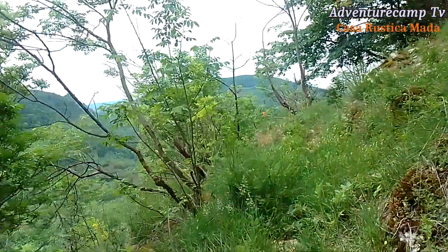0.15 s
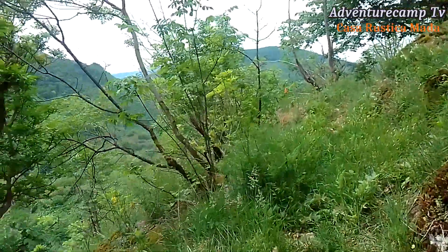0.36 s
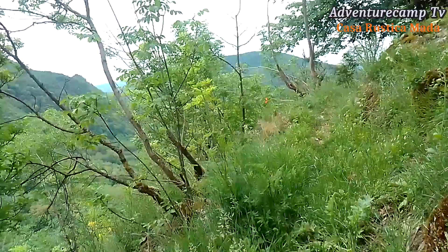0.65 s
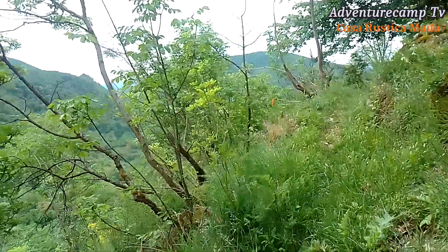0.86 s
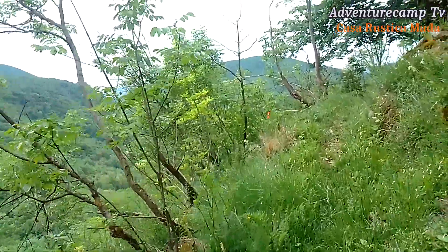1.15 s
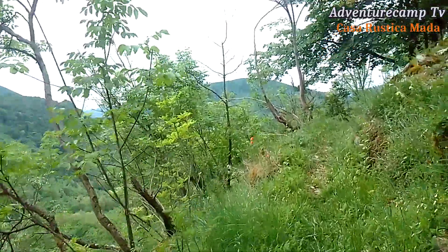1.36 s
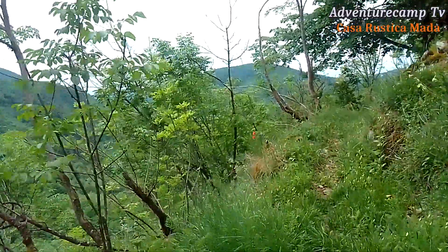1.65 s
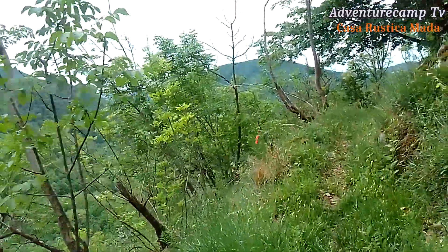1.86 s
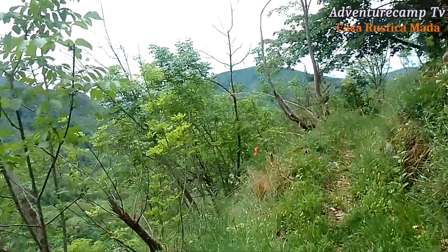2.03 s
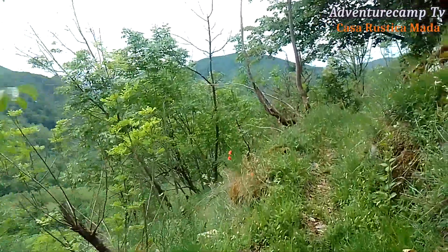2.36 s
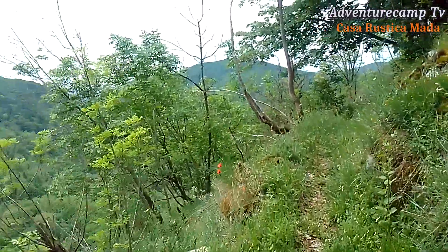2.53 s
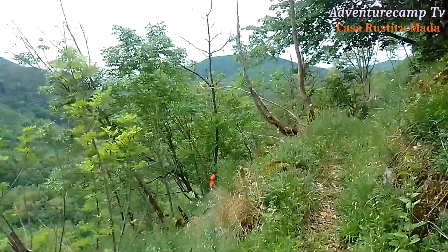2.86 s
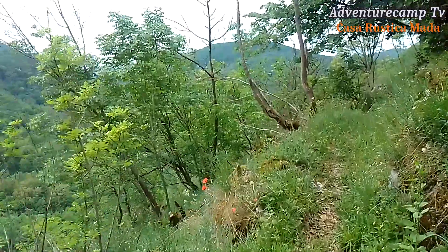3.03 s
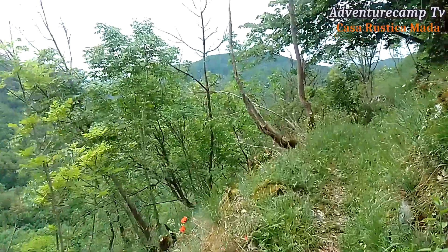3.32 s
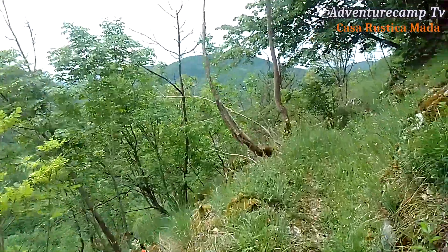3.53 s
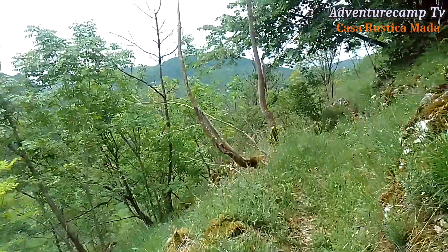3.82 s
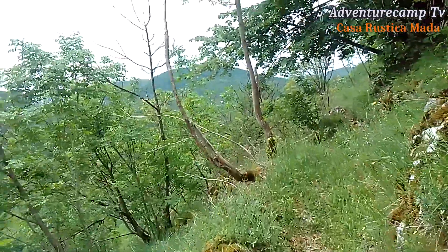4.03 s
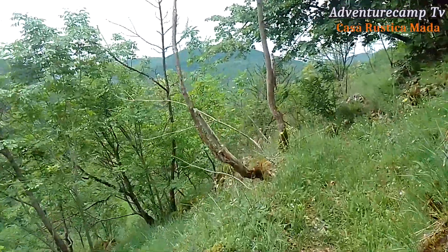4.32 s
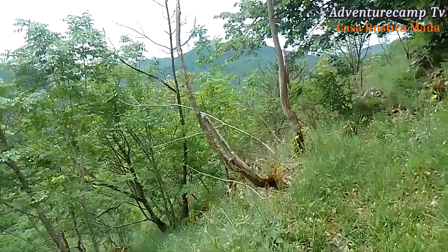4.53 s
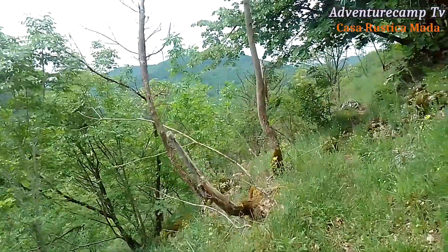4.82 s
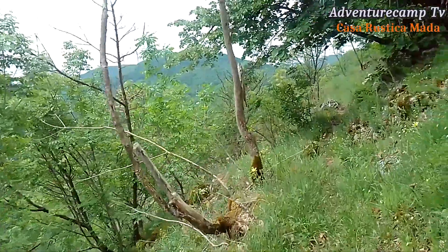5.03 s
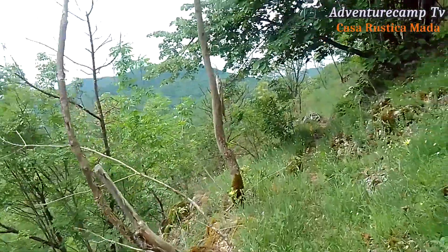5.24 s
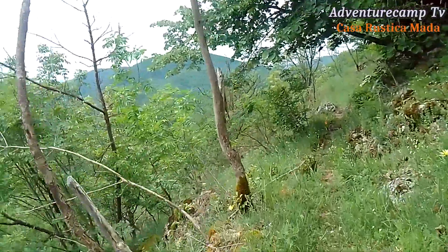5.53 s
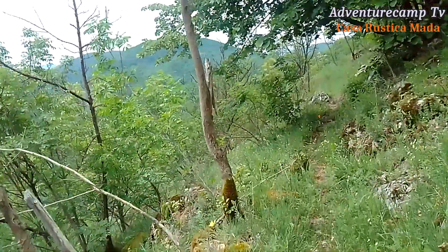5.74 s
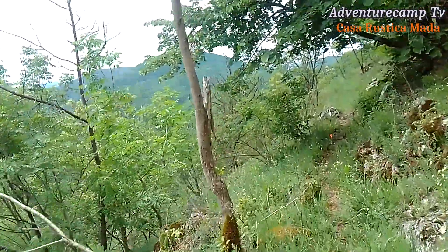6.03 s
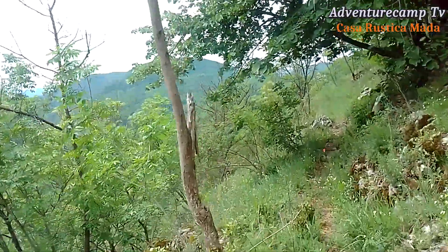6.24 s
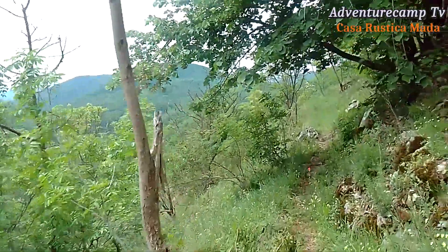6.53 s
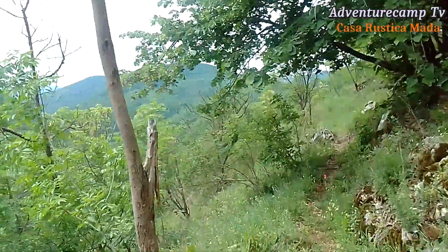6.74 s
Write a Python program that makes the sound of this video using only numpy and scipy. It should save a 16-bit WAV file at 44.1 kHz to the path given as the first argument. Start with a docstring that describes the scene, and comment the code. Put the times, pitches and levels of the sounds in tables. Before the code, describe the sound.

A hiker walks through tall grass on a hillside, close to the microphone. Uneven, high, hissy swishes mix with sharp stem snaps and soft, dull boot thuds. The loudest cracks and a burst of crackling come in the first half, then the rustling grows lighter. A distant river rushes quietly throughout. Faint chirps appear midway, and a bird whistles alternating high and low notes near the end.

```python
"""Hiking through tall grass

A hiker on a hillside path carries a small camera whose microphone port (its opening) rings near 7 kHz.
Grass swishes as many tiny blades slip, stems snap in sharp bursts and boots thud on soft ground.
Behind them wind buffets the port, a river rushes far down the valley and birds whistle high and low.
The camera turns itself down for a moment after the loudest cracks."""
import sys
import numpy as np
from scipy import signal
from scipy.io import wavfile
from scipy.ndimage import uniform_filter1d

SR = 44100
rng = np.random.default_rng(int(sys.argv[2]) if len(sys.argv) > 2 else 0)


def log_audio(samples):
    """Write samples as a 16-bit WAV file to the path given in sys.argv[1]."""
    # one column per channel
    frames = np.atleast_2d(samples).T
    # limit to full scale, then quantise
    limited = np.clip(frames, -1, 1)
    pcm = np.round(limited * 32767).astype(np.int16)
    wavfile.write(sys.argv[1], SR, pcm)


N = 303408
TIME = np.arange(N) / SR

# Tone colours (how strong each frequency is) that several sounds share: f/Hz, level/dB
DULL_SCUFF = [(600, -7.5), (1100, 4.5), (1600, -0.5), (2400, -1), (3800, -1.5), (4600, -5), (6000, -23)]
AIRY_TOP = [(9000, -31.5), (10500, 0), (12500, -2.5), (14500, -5.5), (15700, -4), (17000, -7)]
LOW_RUSTLE = [(150, -32), (230, -2.5), (500, 0.5), (900, -3), (1600, -49)]


def gain_of(db):
    """Turns decibels into a number to multiply a sound by."""
    return 10 ** (np.asarray(db) / 20)


def evened(x):
    """Scales a signal so that its average power is 1."""
    return x / np.sqrt(np.mean(x ** 2) + 1e-20)


def follow(rows, t):
    """Reads a table at the times t, drawing straight lines between its rows."""
    times, *columns = np.transpose(rows)
    return [np.interp(t, times, column) for column in columns]


def add(mix, start, sound):
    """Lays a sound into the mix, start seconds in."""
    part = mix[round(start * SR):][:len(sound)]
    part += sound[:len(part)]


def colour(x, points, size=4096):
    """Gives x a tone colour, using a filter of energy 1 that rings only after it is struck."""
    f, db = np.transpose(points)
    hz = np.abs(np.fft.fftfreq(size, 1 / SR))
    log_gain = np.log(gain_of(np.interp(np.log(hz + 1), np.log(f + 1), np.maximum(db, -90))))
    response = np.exp(np.conj(signal.hilbert(log_gain)))
    taps = np.fft.ifft(response).real[:size // 2]
    return signal.oaconvolve(x, taps / np.linalg.norm(taps))[:len(x)]


def flicker(ms, db):
    """A random gain that wanders by about db decibels over about ms milliseconds."""
    span = max(round(ms * SR / 1000), 1)
    drift = uniform_filter1d(uniform_filter1d(rng.standard_normal(N), span), span)
    return gain_of(db * evened(drift))


def patches(bins, frames, high, long):
    """A random map of blobs, each about `high` frequency steps by `long` time steps."""
    noise = rng.standard_normal((frames, bins))
    return evened(uniform_filter1d(uniform_filter1d(noise, high, axis=1), long, axis=0)).T


def hiss():
    """The steady hiss of leaves and of the microphone itself."""
    tone = [(710, -26.5), (1200, -13), (1490, -3.5), (3130, -16), (5370, -10), (6390, -21), (7510, -10),
            (8360, -31.5), (9420, -15), (15100, -23), (15800, -5.5)]  # colour of the hiss: f/Hz, level/dB
    return gain_of(-56.5) * colour(rng.standard_normal(N), tone)


def wind():
    """Wind buffets the port and makes a low, lumpy rumble."""
    gusts = [(0.0, -71.5), (0.21, -75.5), (1.42, -71.5), (1.92, -84.5), (1.97, -66), (2.01, -80),
             (2.47, -82), (2.72, -71), (2.95, -84), (3.41, -78.5), (3.43, -70), (3.85, -99), (3.91, -77.5),
             (5.42, -82), (5.48, -74), (5.73, -80), (6.75, -74.5), (6.88, -81)]  # strength of the buffeting: t/s, level/dB
    tone = [(20, -1), (45, -9), (90, -1), (130, 2.5), (165, -5), (200, -4), (300, -43)]  # colour of the rumble: f/Hz, level/dB
    lumps = rng.standard_normal(N) * flicker(ms=64, db=2.5)
    return gain_of(follow(gusts, TIME)[0]) * colour(lumps, tone, size=16384)


def river():
    """A far roar. The slope blocks its treble, and the slope's echo cuts a notch (a narrow dip) in it."""
    loudness = [(0.0, -42.5), (0.73, -46), (0.82, -47.5), (1.05, -47), (1.4, -42.5), (1.55, -45),
                (1.78, -45), (2.05, -44.5), (3.35, -42), (3.68, -44), (4.92, -41.5), (5.31, -43),
                (5.67, -42), (5.77, -43), (6.53, -41), (6.76, -40.5), (6.88, -41)]  # strength of the roar: t/s, level/dB
    tone = [(150, -53), (200, -13), (250, -5), (300, -2), (400, -2), (500, 0), (700, -1.5), (1000, -5.5),
            (1400, -11)]  # colour of the roar: f/Hz, level/dB
    # how the slope shades it as the hiker turns: t/s, upper edge/Hz, notch/Hz, notch depth/dB
    shade = [(0, 1100, 924, 22.5), (.6, 1140, 944, 26), (1, 990, 874, 31), (1.15, 700, 840, -1),
             (1.45, 720, 905, -6), (1.75, 945, 970, 16), (2, 1100, 940, 4), (2.3, 920, 930, 7.5),
             (2.9, 990, 910, 5), (3.15, 1100, 860, 5), (4.05, 1150, 980, 9.5), (4.4, 1015, 1060, 9.5),
             (5.3, 1270, 1000, 3.5), (5.65, 1220, 1020, 0), (5.9, 1146, 1030, 7), (6.88, 1190, 1020, 1)]
    hz = np.fft.rfftfreq(2048, 1 / SR)[:, None]
    t = np.arange(N // 512 + 6) * 512 / SR
    edge_hz, notch_hz, depth_db = follow(shade, t)
    hollow_db = 2.3 * np.exp(-((hz / edge_hz - .93) / .085) ** 2)  # a lift just under the edge
    blocked_db = 10 * np.log10(1 + (hz / edge_hz) ** 16.4)
    notch_db = depth_db * np.exp(-((hz - notch_hz) / 60) ** 2)
    f, db = np.transpose(tone)
    level_db = np.interp(np.log(hz + 1), np.log(f), db) + hollow_db - blocked_db - notch_db
    level_db += 2 * patches(len(hz), len(t), high=3, long=6)
    real, imag = rng.standard_normal((len(t), len(hz), 2)).T
    roar = signal.istft(gain_of(level_db) * (real + 1j * imag), nperseg=2048, noverlap=1536)[1][:N]
    gain = gain_of(follow(loudness, TIME)[0]) * flicker(ms=17, db=.8) * flicker(ms=53, db=.74)
    return gain * evened(roar)


def rush():
    """A narrow band of rushing noise, higher than the river, that comes and goes."""
    loudness = [(0, -63), (.4, -79), (3, -69), (6.3, -67.5), (6.6, -56), (6.88, -62)]  # t/s, level/dB
    centre_hz, width_hz = 1600, 240
    b, a = signal.iirpeak(centre_hz, centre_hz / width_hz, SR)
    band = signal.lfilter(b, a, rng.standard_normal(N))
    return gain_of(follow(loudness, TIME)[0]) * evened(band)


def whistle(notes, waver_hz):
    """Almost pure notes that glide, swell and fade; pitch and level waver on the way through leaves."""
    attack_s, swell_s, fade_db_per_s = .016, .024, 250
    waver = waver_hz * np.log(flicker(ms=2.4, db=20 / np.log(10)))
    out = np.zeros(N)
    for start, length, first_hz, last_hz, db, swell_at, top_db in notes:
        t = np.arange(0, length + .25, 1 / SR)
        glide_hz = last_hz + (first_hz - last_hz) * np.exp(-3 * t / length)
        hz = glide_hz + waver[round(start * SR):][:len(t)]
        swell_db = (top_db - db) * np.exp(-((t - swell_at) / swell_s) ** 4)
        fade_db = fade_db_per_s * np.maximum(t - length, 0)
        tone = np.sqrt(2) * np.sin(2 * np.pi * np.cumsum(hz) / SR)
        add(out, start, np.minimum(t / attack_s, 1) * gain_of(db + swell_db - fade_db) * tone)
    return out * flicker(ms=10, db=1.6)


def birds():
    """One bird's two-note calls echo off the trees; a farther bird is heard through echoes alone."""
    # notes, high then low: t/s, length/s, first f/Hz, last f/Hz, level/dB, loudest after/s, loudest/dB
    notes = [(4.875, 0.079, 4770, 4645, -69, .02, -60), (5.06, 0.13, 4010, 4125, -60, 0.059, -53),
             (5.345, .11, 5070, 4990, -59.5, .077, -43), (5.548, 0.083, 3950, 4050, -63.5, 0.014, -56),
             (5.855, 0.16, 5070, 5070, -53, 0.12, -51), (6.032, 0.11, 4030, 4100, -65, 0.13, -55),
             (6.36, 0.11, 5140, 5118, -54.5, .07, -41.5)]
    far_chirps = [(2.93, .08, 4300, 4210, -71, .04, -71), (3.04, 0.14, 4210, 4180, -66.5, .02, -65),
                  (3.19, .04, 4130, 4170, -69, .02, -66), (3.285, .025, 4240, 4240, -64, .01, -59),
                  (3.32, .03, 4030, 4020, -67, .01, -66), (3.415, 0.033, 3870, 3930, -65, .015, -53),
                  (3.465, .04, 4000, 4180, -62, .03, -54), (3.525, 0.061, 4200, 4100, -62.5, .015, -56),
                  (3.59, .025, 4070, 4000, -65, .01, -62)]  # the farther bird's notes: same columns
    calls = whistle(notes, waver_hz=14)
    twitter = gain_of(-6.5) * whistle(far_chirps, waver_hz=90.5)  # weakened by distance
    t = np.arange(SR // 2) / SR
    echoes = rng.standard_normal(len(t)) * gain_of(-60 * t / .4) * (1 - np.exp(-t / .015))
    scatter = rng.standard_normal(len(t)) * gain_of(-60 * t / .13)
    trail = gain_of(-9) * signal.oaconvolve(calls, echoes / np.linalg.norm(echoes))[:N]
    return calls + trail + signal.oaconvolve(twitter, scatter / np.linalg.norm(scatter))[:N]


def boots():
    """A boot on soft ground makes a low ring that dies quickly, and a longer muffled crunch."""
    steps = [(0.165, -40, 514, .05, -40.5), (0.24, -29.5, 271, 0.079, -41.5), (0.412, -34, 364, 0.058, -57),
             (0.798, -22.5, 336, 0.035, -35.5), (1.49, -26.5, 325, 0.041, -43),
             (1.58, -34, 400, 0.056, -43), (2.631, -39, 300, 0.082, -35.5), (3.457, -30, 608, 0.04, -47),
             (4.431, -23.5, 288, 0.034, -39), (5.03, -39.5, 450, .05, -41.5),
             (5.102, -21.5, 600, 0.03, -45), (5.49, -40, 594, .05, -40), (6.056, -26.5, 324, 0.054, -44.5),
             (6.168, -27, 576, 0.033, -51), (6.73, -38, 587, 0.12, -47)]  # boots landing: t/s, ring level/dB, f/Hz, time to fade 60 dB/s, crunch/dB
    out, t = np.zeros(N), np.arange(SR // 5) / SR
    for start, db, hz, fade_s, crunch_db in steps:
        ring = gain_of(db - 60 * t / fade_s) * np.sin(2 * np.pi * hz * t)
        crunch = gain_of(crunch_db - 60 * t / .4) * colour(rng.standard_normal(len(t)), LOW_RUSTLE)
        add(out, start, (ring + crunch) * (1 - np.exp(-t / .0014)))
    return out


def snaps():
    """A stem cracks in a burst that rings the port, then splinters; shorter bursts sound sharper."""
    # stems breaking: t/s, tick peak/dB, length/ms, then relative to the tick: crack/dB, scuff/dB, air/dB
    breaks = [(0.0638, -18, .3, -30, -35, -30), (0.0727, -18, 0.35, -33, -36, -34),
              (0.2107, -18, .5, -31, -35.5, -34), (0.274, -16.5, .4, -34, -38, -36),
              (0.6406, -32, 1.1, -30.5, -29, -25), (0.993, -32, .3, -24, -34, -20),
              (1.032, -24.5, 1.9, -31, -32, -38), (1.222, -30, 1.4, -28, -27, -28),
              (1.241, -27, 0.92, -30, -32, -30), (1.3325, -30, .4, -26, -23, -26),
              (1.5529, -21, .3, -36, -40, -32), (1.5765, -11, 0.32, -31, -42, -31),
              (1.5946, -4.5, 0.24, -39, -52, -40), (1.6446, 1.5, 0.37, -44, -59, -39),
              (2.068, -28, 1.5, -27, -30, -20), (2.2687, -23.5, .9, -39, -38, -38),
              (2.647, -22, 0.47, -29, -32, -26), (2.663, -16, 0.26, -31, -35, -27),
              (2.712, -17, 0.45, -28, -35, -32), (2.7433, -12, 0.38, -23, -17, -30),
              (2.768, -10, 0.32, -30, -38, -35), (2.799, -12, .4, -28, -36, -35),
              (2.8073, -14, .3, -21, -38, -28), (2.826, -10, .6, -11, -40, -29),
              (2.859, -10, .6, -12, -36, -35), (2.8676, -12.5, .3, -22, -40, -31),
              (2.886, -18, .4, -11, -31, -32), (2.9216, -19, .4, -32, -37, -36),
              (3.162, -31, 0.5, -7, -22, -29), (3.4274, -21, .5, -33, -39, -35),
              (3.5728, -22, .7, -34, -34, -24), (3.909, -19, 1.9, -10, -25.5, -36),
              (3.965, -26.5, 2.3, -29, -27, -27), (4.932, -22, 0.83, -29, -38, -23),
              (5.2404, -30, 0.72, -25, -17, -28), (5.4647, -12.5, .5, -35, -43, -27),
              (5.4764, -27, 0.49, -22, -20, -23), (5.563, -20.5, 0.45, -30, -16, -33),
              (5.7952, -35.5, 0.3, -22, -22, -15), (6.6855, -29, 0.46, -27, -12, -23),
              (6.7226, -23.5, 0.57, -28, -15, -37)]
    tick_tone = [(4500, -41), (5600, -22), (6400, -7.5), (7300, 5), (8200, -2), (9200, -18), (11000, -27)]  # the port struck once, close by: f/Hz, level/dB
    crack_tone = [(3000, -2), (4000, 1), (5200, 8), (6200, 35), (7400, -32), (9000, -27), (10500, -17),
                  (12500, -69)]  # the wide edge of a snap: f/Hz, level/dB
    out, t = np.zeros(N), np.arange(1500) / SR
    for start, db, ms, crack_db, scuff_db, air_db in breaks:
        age = t * 1000 / ms
        splinters = .04 * np.exp(-t / .006)
        burst = rng.standard_normal(len(t)) * (age * np.exp(1 - age) + splinters)
        burst[np.argmax(age > 1)] += .75 / ms  # the break itself is one sharp click
        parts = [(tick_tone, 0), (crack_tone, crack_db), (DULL_SCUFF, scuff_db), (AIRY_TOP, air_db)]
        for tone, part_db in parts:
            part = colour(burst, tone)
            add(out, start, gain_of(db + part_db) * part / abs(part).max())
    return out


def blades(per_s, spread_db):
    """Tiny uneven slips of grass blades over finer rubbing, in clumps that start at once and die away."""
    sizes = gain_of(spread_db * np.minimum(rng.exponential(1, N), 4)) * rng.choice([-1, 1], N)
    slips = evened(sizes * (rng.random(N) < per_s / SR))
    starts = rng.exponential(1, N) * (rng.random(N) < 60 / SR)  # about 60 clumps a second
    clumps = 2.6 + signal.lfilter([1], [1, -np.exp(-1 / (.008 * SR))], starts)
    rubbing = rng.standard_normal(N)
    return evened((slips + rubbing) * clumps * flicker(ms=10, db=.68))


def leg_sweeps():
    """Levels in dB of the grass's ring, wide swish and airy top: each sweep rises, holds and falls."""
    # legs sweeping through grass: t/s, hold/s, ring level/dB, time to rise 20 dB/s,
    # time to fall 20 dB/s, then relative to the ring: swish/dB, air/dB
    sweeps = [(0.039, .05, -30.5, 0.1, 0.21, -9.5, -17), (0.151, 0.15, -33.5, .15, -0.01, -14, -26.5),
              (0.352, 0.031, -41, -0.8, -0.1, -14, -25), (0.5, .01, -44, 0.3, 0.2, -22, -25),
              (0.638, .01, -34, -0.07, 0.08, -13, -18), (0.77, 0.025, -40.5, 0.2, 0.6, -16, -20),
              (0.943, 0.073, -41, -0.1, .03, -18, -21), (1.05, .005, -32.5, 0, .07, -19, -32),
              (1.145, 0.0079, -42.5, .08, 0.2, -17, -29), (1.252, 0.0041, -28.5, -0.01, .06, -15.5, -22),
              (1.357, .005, -33, 0.1, .1, -14.5, -19), (1.526, .005, -25.5, 0.14, .07, -18.5, -21),
              (1.584, 0.013, -21.5, 0.04, .02, -17.5, -27), (1.655, .02, -33, 0.37, 0.05, -14, -23),
              (1.906, 0.15, -51, 1.5, 0.7, -8, -12.5), (2.073, 0.0075, -32, 0.05, 0.09, -14.5, -17),
              (2.155, 0.11, -40.5, .1, 0.33, -21, -23), (2.51, 0.013, -49.5, .03, 1.2, -5.5, -11),
              (2.65, 0.012, -29, 0.1, 0.29, -16, -19), (2.757, .02, -25.5, 0.14, 0.0853, -5, -25),
              (2.8, 0.077, -27.5, 0.05, 0.07, -6, -21), (3.075, .01, -43.5, 0.3, 0.16, -13, -21),
              (3.211, 0.12, -40, 0.07, .5, -15.5, -16.5), (3.435, .15, -37.5, .5, 0.15, -19, -27),
              (3.924, 0.0073, -39, 0.15, 0.18, -8, -15), (4.126, 0.027, -27, .12, 0.1, -13.5, -27),
              (4.199, 0.018, -33.5, 0.18, 0.09, -15.5, -21), (4.434, .005, -50, 0.7, .15, -12, -20),
              (4.766, 0.061, -47.5, 1.7, 0.16, -12, -14), (4.914, 0.028, -43, -0.35, 0.04, -9.5, -12),
              (5.035, 0.0067, -47, -0.22, 0.1, -10, -7), (5.102, .05, -46.5, -0.5, .08, -8.5, -15),
              (5.213, .005, -47, 0.1, -0.1, -22, -24), (5.244, 0.073, -41, -0.1, 0.2, -13, -16),
              (5.46, 0.018, -36.5, -0.1, 0.13, -12, -17), (5.58, .01, -48, 1, 0.6, -16, -25),
              (5.796, .04, -47, 0, 0.14, -11, -13), (5.888, 0.014, -43.5, 0.02, 0.24, -15, -19),
              (6.062, 0.0046, -41.5, 0.07, 0.16, -10.5, -20), (6.158, 0.0043, -46, -0.3, 0.3, -17, -20),
              (6.367, .02, -52.5, -0.2, .1, -5, -9), (6.512, .04, -54.5, -0.1, 1, -7, -12),
              (6.627, .01, -47, -0.15, -2, -12, -9), (6.68, 0.027, -39.5, 0.15, -0.2, -13, -16),
              (6.75, .03, -30, 0.05, .05, -13, -24), (6.816, .005, -37, 0, -0.8, -21, -27)]
    rest_db = (-74, -64.5, -72)  # grass settling between sweeps: ring, swish, air
    t = np.arange(N // 32 + 2) * 32 / SR
    power = gain_of(rest_db)[:, None] ** 2 * np.ones(len(t))
    for start, hold, db, rise, fall, swish_db, air_db in sweeps:
        before = np.maximum(start - t, 0) / max(rise, .01)
        after = np.maximum(t - start - hold, 0) / max(fall, .01)
        power += gain_of(db - 20 * (before + after) + np.array([[0], [swish_db], [air_db]])) ** 2
    return [np.interp(TIME, t, 10 * np.log10(band)) for band in power]


def grass():
    """Slipping blades swish and ring the port; shifting stems nearby colour the sound in small patches."""
    ring_tone = [(5600, -49.5), (6300, -27), (6750, -3), (7100, 2.5), (7450, 7), (7900, -1.5),
                 (8250, -10.5), (8800, -26.5), (10000, -38)]  # the ring of the port: f/Hz, level/dB
    swish_tone = [(3500, -39), (4500, -9), (5300, -4), (6200, 5.5), (7400, -2), (8600, 3), (9800, -2),
                  (11000, -12), (13000, -49.5)]  # the wide swish on both sides of the ring: f/Hz, level/dB
    slips = blades(per_s=2000, spread_db=1.5)
    finer = evened(slips + .98 * rng.standard_normal(N))
    puffs = finer * evened(flicker(ms=18, db=1.8))
    ring_db, swish_db, air_db = leg_sweeps()
    effort_db = swish_db + 50  # scuff and rustle grow with the swish, but more slowly
    layers = [(slips, ring_db, ring_tone), (slips, swish_db, swish_tone), (puffs, air_db, AIRY_TOP),
              (finer, -56 + .4472 * effort_db, DULL_SCUFF), (finer, -56 + .5 * effort_db, LOW_RUSTLE)]
    swishing = sum(colour(noise * gain_of(db), tone) for noise, db, tone in layers)
    spectra = signal.stft(swishing, nperseg=512, noverlap=384)[2]
    stems = evened(gain_of(2.93 * patches(*spectra.shape, high=2, long=20)))
    return signal.istft(spectra * stems, nperseg=512, noverlap=384)[1][:N]


def scene():
    """All the sounds in one channel; the port cuts the bass of everything but the wind."""
    mix = hiss() + grass() + snaps() + boots() + river() + rush() + birds()
    low_cut = signal.butter(4, 215, "highpass", fs=SR, output="sos")
    return (signal.sosfilt(low_cut, mix) + wind())[None]


def record(dry):
    """The camera turns down just after loud cracks and recovers, clips peaks and cuts the top treble."""
    limit_db, max_dip_db, lag_s, recover_db_per_s = -6.2, 10, .0067, 108
    ceiling, top_hz = .92, 15850
    over = np.clip(20 * np.log10(abs(dry[0]) + 1e-9) - limit_db, 0, 1)
    recovery_db = recover_db_per_s * TIME
    held_db = np.maximum.accumulate(np.where(over > 0, max_dip_db * over + recovery_db, 0))
    dip_db = np.maximum(held_db - recovery_db, 0)
    late_db = np.interp(TIME - lag_s, TIME, uniform_filter1d(dip_db, size=200))
    clipped = np.clip(dry / gain_of(late_db), -ceiling, ceiling)
    treble_cut = signal.firwin(511, top_hz, window=("kaiser", 9), fs=SR)
    return signal.oaconvolve(clipped, treble_cut[None], "same")


dry = scene()
out = record(dry)
log_audio(out)
```